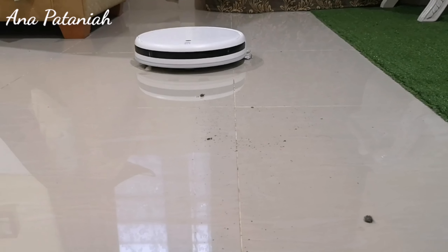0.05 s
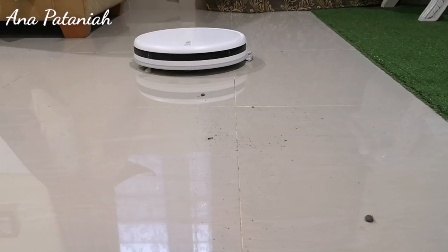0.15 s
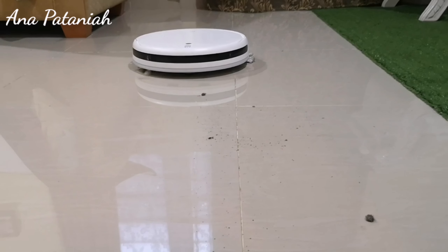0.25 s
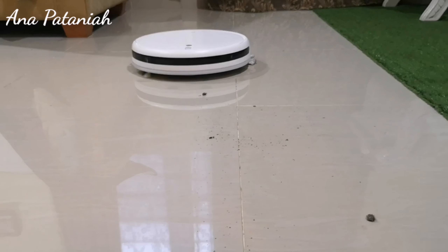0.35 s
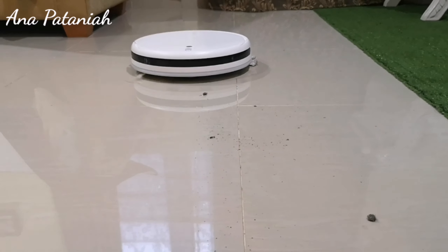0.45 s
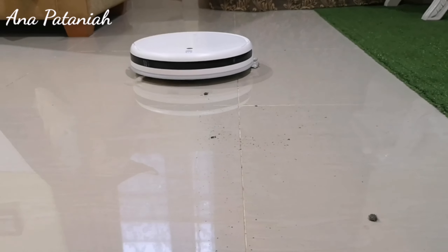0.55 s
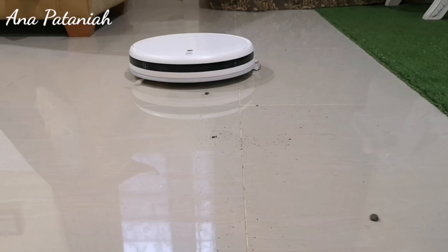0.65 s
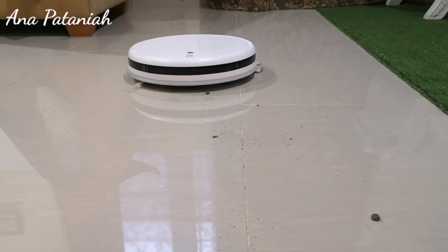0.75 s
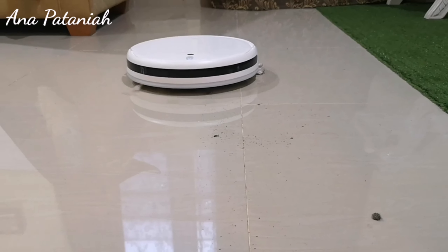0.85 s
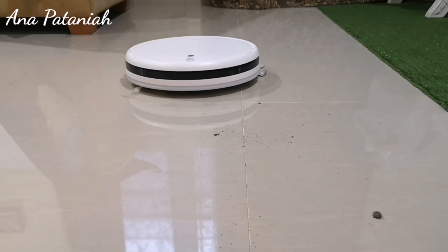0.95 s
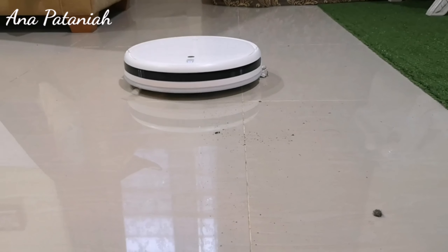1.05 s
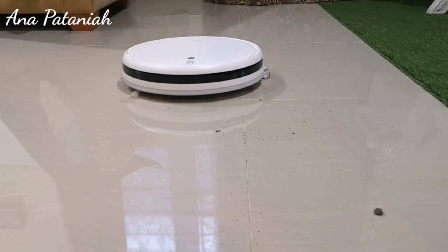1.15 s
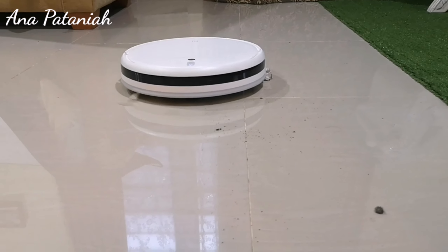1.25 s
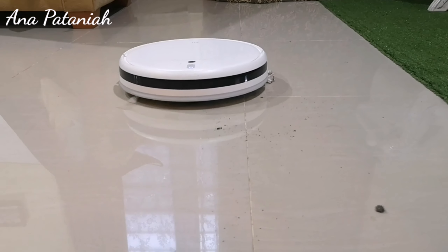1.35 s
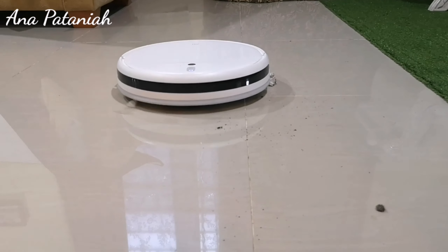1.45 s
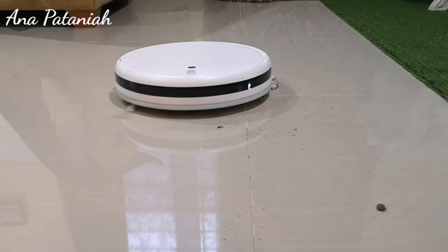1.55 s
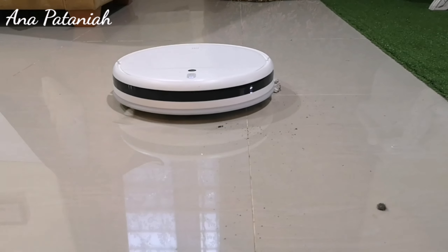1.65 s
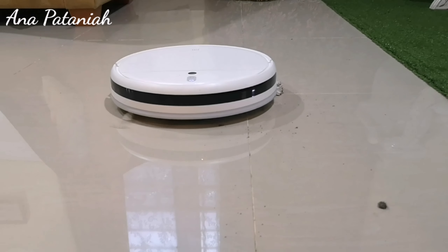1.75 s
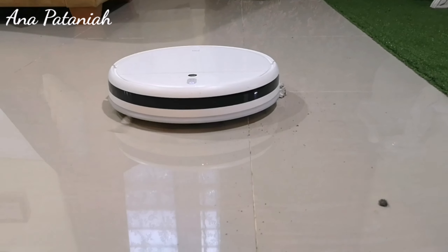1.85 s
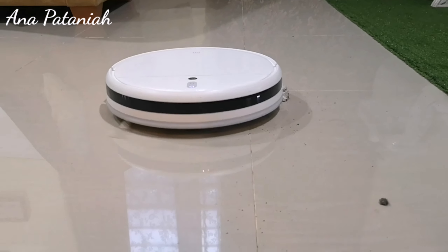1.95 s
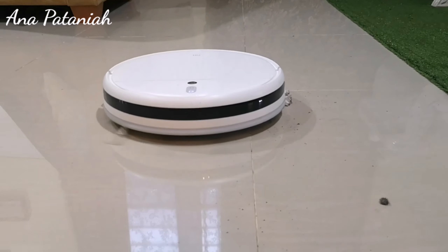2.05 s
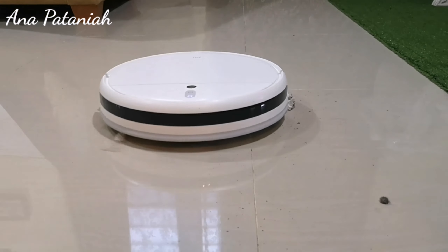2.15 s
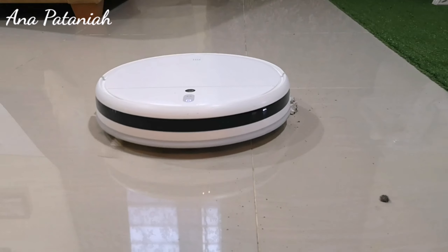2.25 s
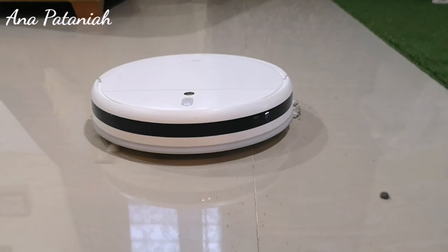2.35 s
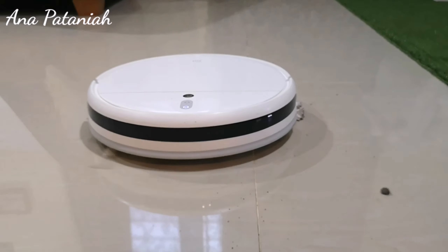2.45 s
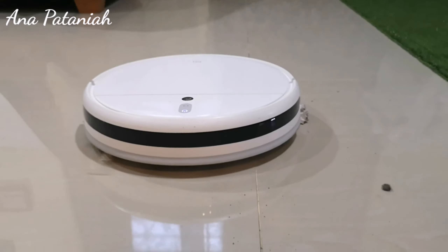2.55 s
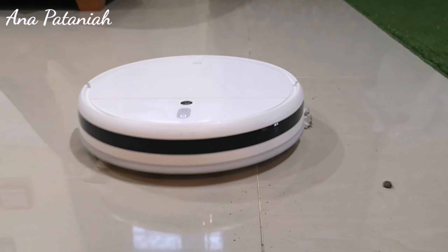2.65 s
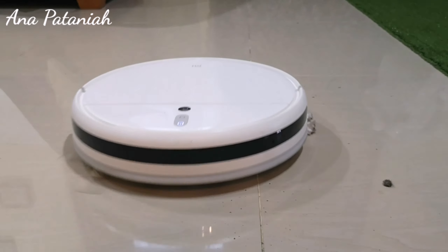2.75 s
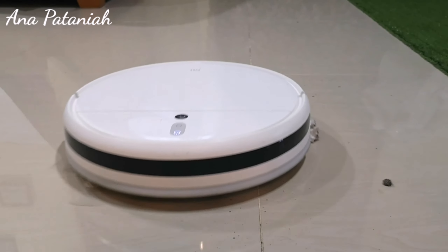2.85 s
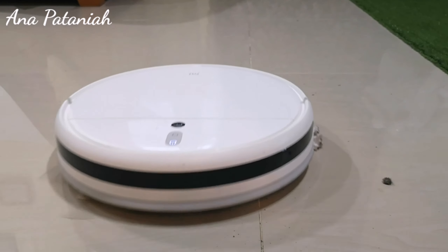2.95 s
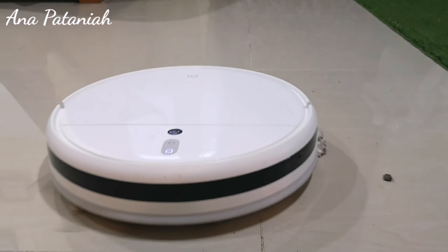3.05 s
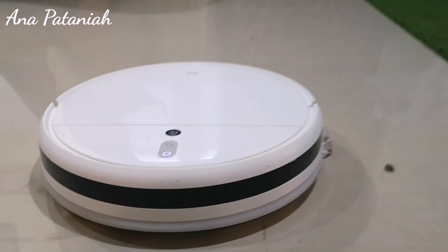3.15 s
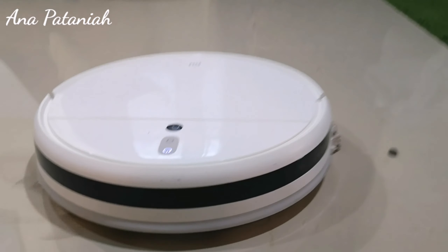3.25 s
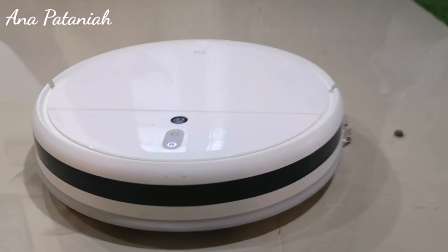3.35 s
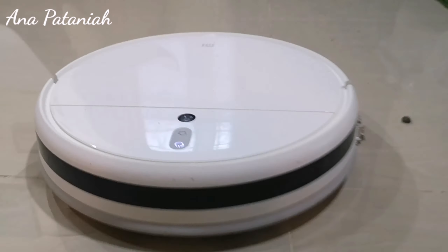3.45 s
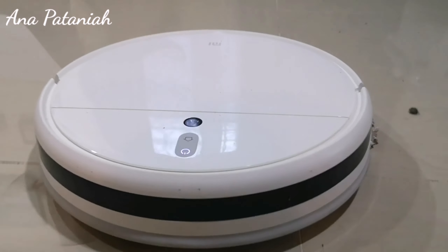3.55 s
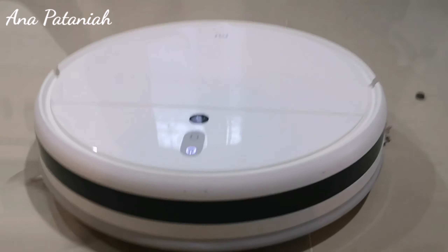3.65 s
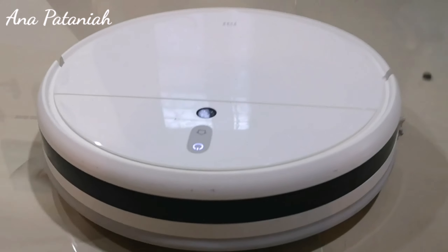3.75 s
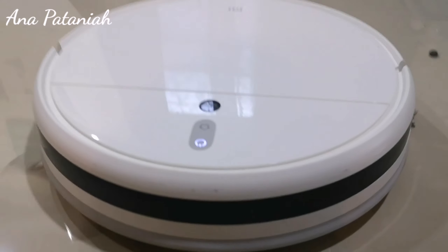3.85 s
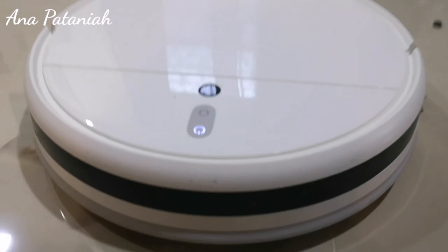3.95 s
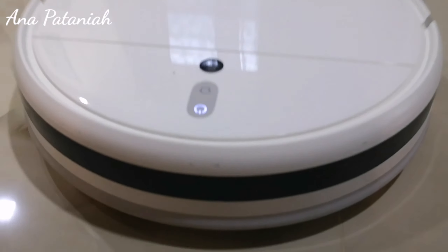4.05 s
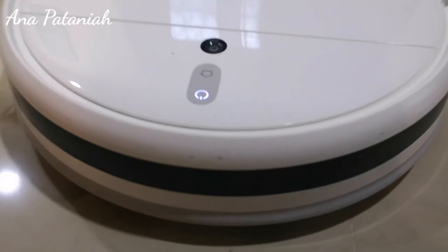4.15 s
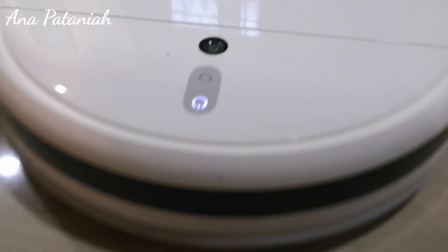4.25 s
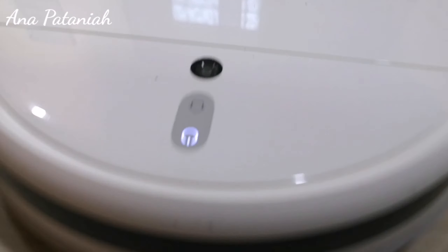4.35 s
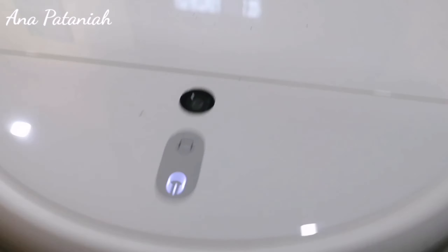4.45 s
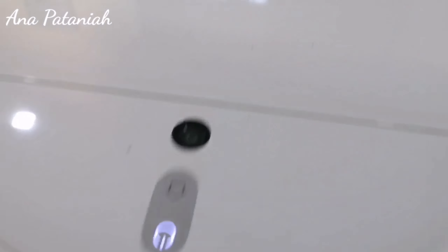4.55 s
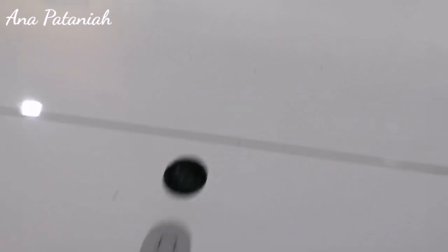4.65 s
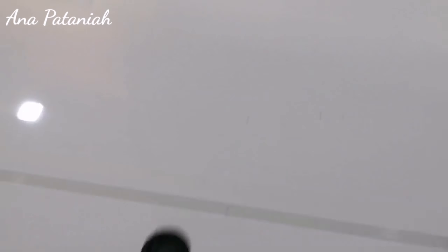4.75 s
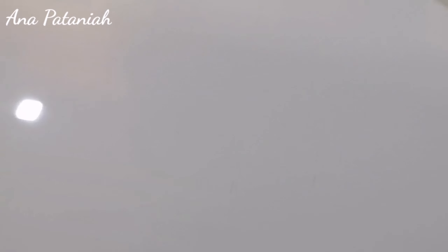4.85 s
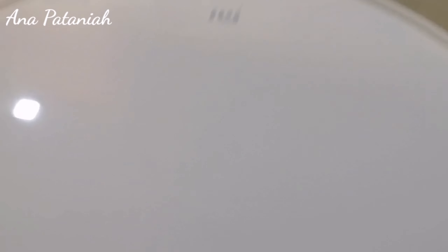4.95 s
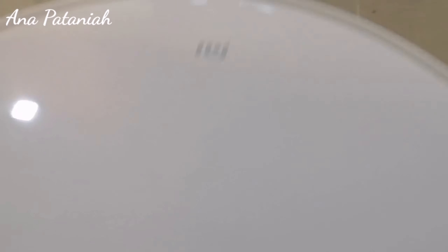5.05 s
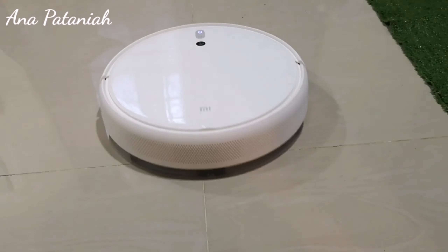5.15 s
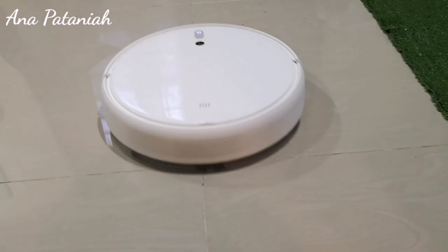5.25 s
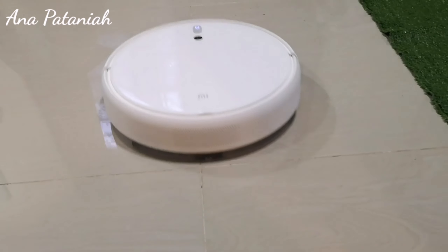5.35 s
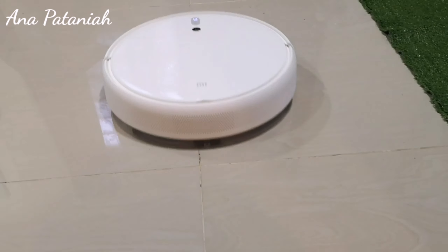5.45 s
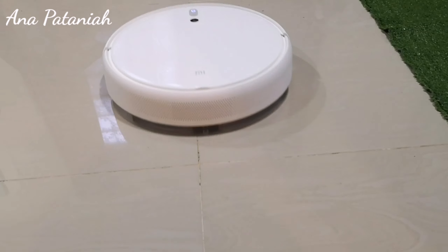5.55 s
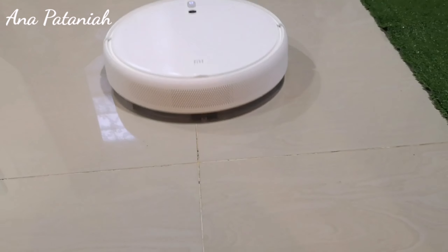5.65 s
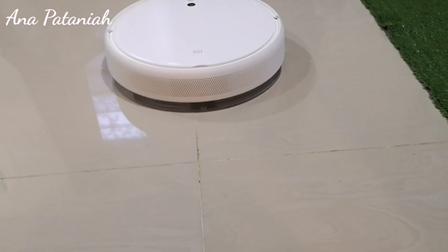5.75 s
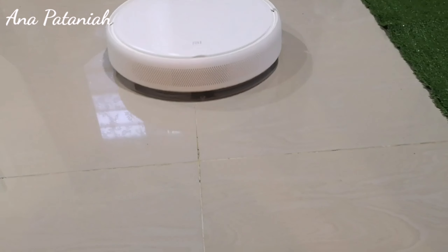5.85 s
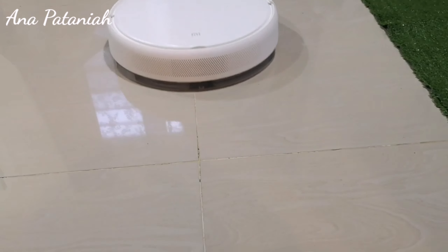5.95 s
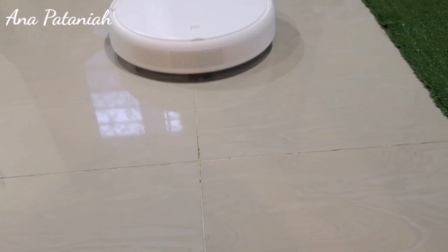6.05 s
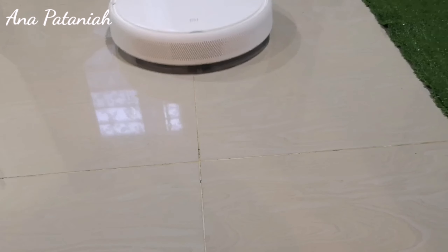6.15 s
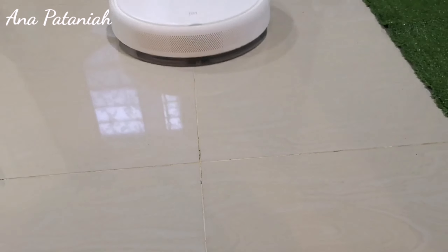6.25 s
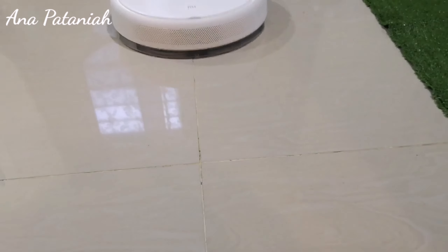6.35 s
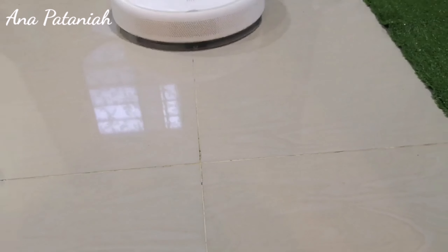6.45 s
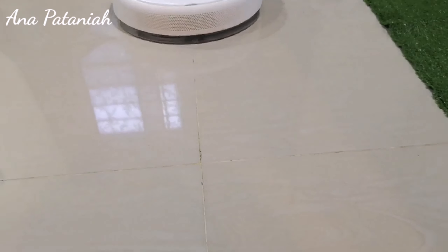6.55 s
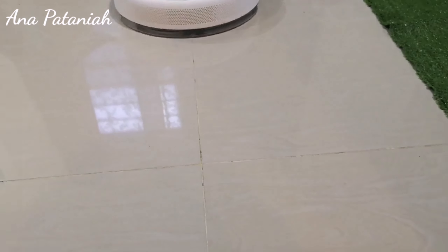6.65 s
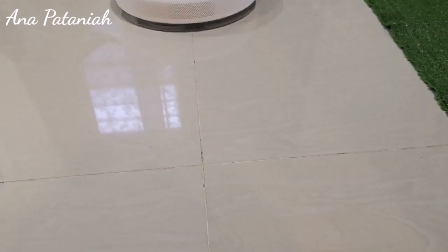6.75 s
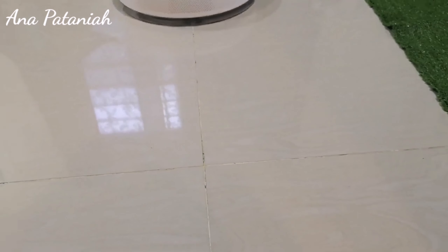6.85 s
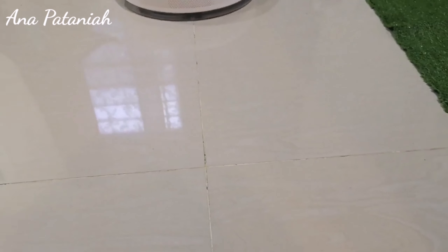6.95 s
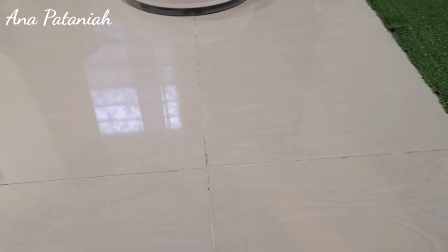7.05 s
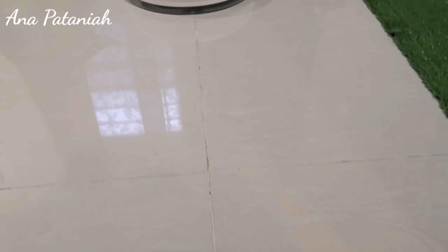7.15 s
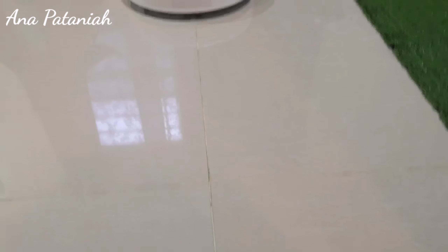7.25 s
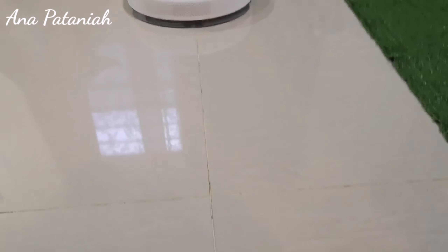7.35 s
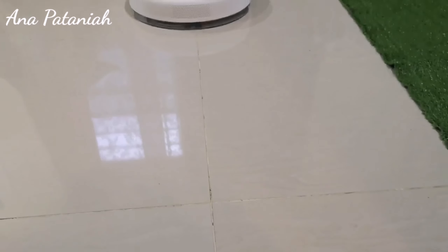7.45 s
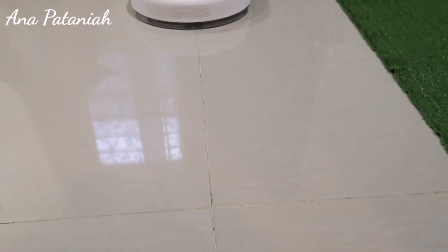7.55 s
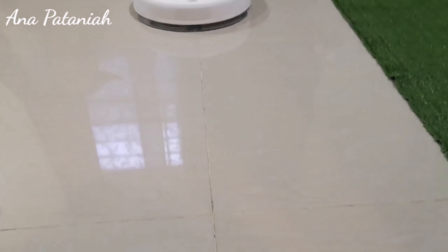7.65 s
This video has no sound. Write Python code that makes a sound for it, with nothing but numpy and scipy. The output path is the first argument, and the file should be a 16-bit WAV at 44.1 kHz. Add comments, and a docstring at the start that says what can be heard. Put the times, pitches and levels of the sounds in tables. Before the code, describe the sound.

Steady suction hum and thin brush whine swell toward the listener over a tiled floor, cut out for a moment, then return with a breathier exhaust.

```python
"""The suction fan of a robot vacuum hums and hisses while the machine rolls over glazed tiles.
It nears from the front, the sound fades out, then it resumes from behind the machine.
Shaped noise makes the air; steady partials make the fan, the brush motor's whine and the uneven wheel gears.
The roller's flaps pulse the treble, short rings make grit clicks, and narrow noise bands whistle and slide.
Rumble and a faint mains hum lie underneath."""
import sys
import numpy as np
from scipy import signal
from scipy.fft import rfft, irfft, next_fast_len
from scipy.io import wavfile
from scipy.ndimage import uniform_filter1d

SR = 44100
rng = np.random.default_rng(int(sys.argv[2]) if len(sys.argv) > 2 else 0)


def store_pcm(level_fs):
    """Save levels as 16-bit WAV."""
    pcm = np.round(np.clip(level_fs, -1, 1) * 32767).astype(np.int16)
    wavfile.write(sys.argv[1], SR, np.atleast_2d(pcm).T)


def magnitude_from_level(level_db):
    """Linear magnitude for a level in decibels (20 dB per decade)."""
    exponent = np.asarray(level_db, float) / 20
    return 10 ** exponent


N = 340011
REAR_FROM_S = 5.45  # from here on the machine is heard from behind


def column(table, t, k):
    """One column of a front and rear pair of curves, read at the times t."""
    rows = np.vstack(table)
    return np.interp(t, rows[:, 0], rows[:, k])


def over_hz(points, hz):
    """A table read on a log-frequency axis, the way we hear pitch."""
    f, v = np.transpose(points)
    return np.interp(np.log(hz + 1), np.log(f), v)


def sides(pan_db):
    """Left and right gains, each taking half of the level difference."""
    return magnitude_from_level(np.array([pan_db, -pan_db]) / 2)


def walk(rate, channels=1):
    """Smooth random wander: levels held for 1 / rate s and slewed twice, with a spread of 1."""
    k = int(SR / rate)
    steps = np.repeat(rng.standard_normal((channels, N // k + 1)), k, axis=1)
    w = uniform_filter1d(uniform_filter1d(steps, k), k)[:, :N]
    return w / w.std()


def tone(hz, db, fading_db, drift=0.69):
    """A steady partial of rms level db; room echoes make it fade apart at the two microphones."""
    start = rng.uniform(0, 2 * np.pi)
    phase = 2 * np.pi * np.cumsum(hz) / SR + start + drift * walk(2.7, channels=2)
    return np.sqrt(2) * magnitude_from_level(db + fading_db * walk(6, channels=2)) * np.sin(phase)


def narrow(hz, reach_hz):
    """Noise reaching about reach_hz either side of a moving centre, partly shared by both sides."""
    lowpass = signal.butter(2, reach_hz, fs=SR, output="sos")
    slow = signal.sosfilt(lowpass, rng.standard_normal((2, 3, len(hz))))
    swing = (slow[0] + 1j * slow[1]) / slow.std()
    swing = 0.66 * swing[0] + 0.51 * swing[1:]
    return np.real(swing * np.exp(2j * np.pi * np.cumsum(hz) / SR))


# path of the machine, front then rear: t/s, nearness/dB, microphones over the lid (0-1),
# bearing as left minus right level/dB
PATH = [
    [(0, -0.5, 0, 0.5), (.6, 1.5, 0.04, 0), (1.25, 4, 0.04, 0), (1.55, 4.5, 0.12, -1.5),
     (1.85, 7, 0.03, -3), (2.15, 6.5, 0.01, -4), (2.75, 7.5, 0, -1), (3.1, 9.5, 0.06, -0.5),
     (3.7, 9, 0.04, -1), (4.0, 10, 0.22, -4), (4.2, 8.5, .3, -2.5), (4.6, 11, 0.58, -2.5),
     (4.75, 10.5, 0.7, -1), (4.95, 10, 0.55, -4), (5.1, 8.5, 0.88, -1), (5.28, 10, 0.9, -1.5)],
    [(5.56, -0.5, 0, -2.5), (5.87, 0.5, 0, 4), (6.5, -1, 0.23, 2.5), (7.1, -1.5, 0.09, 2),
     (7.7, -5, 0.02, 4)],
]


def follow(t, laws):
    """A level in dB from nearness and the place over the lid, by a front and a rear law."""
    base_db, slope, lid_db = np.where(t > REAR_FROM_S, *np.array(laws)[::-1, :, None])
    return base_db + slope * column(PATH, t, 1) + lid_db * column(PATH, t, 2)


# body, shell, duct, outlet, hiss and top of the air noise, front then rear:
# level/dB, dB per dB of nearness, dB more over the lid
AIR_LAWS = [
    [(-66, 0.923, 8.5), (-59, 0.8154, 0.5), (-56, 0.56, 6.5), (-59, 0.6762, 4), (-57, 0.9739, -1.5),
     (-70, .5, 5)],
    [(-54.5, 1.16, 0), (-49.5, 0.87, 3.5), (-45.5, 0.64, 3.5), (-59, 0.3, 1), (-54.5, 1.46, -3),
     (-71.5, 0.2, 4)],
]
# room rumble, front then rear: t/s, level/dB
RUMBLE = [
    [(0, -62), (.9, -57.5), (1.25, -52), (1.85, -52.5), (2.15, -56), (2.9, -54), (3.3, -57), (3.45, -53),
     (3.6, -57), (3.72, -52), (4.05, -56), (4.3, -52), (4.7, -52), (5.28, -56)],
    [(5.56, -60), (6.2, -59), (6.5, -58.5), (7.0, -56), (7.7, -57)],
]


def air_db(t, k):
    """Level of air band k; the lowest band is the room's rumble."""
    if k == 0:
        return column(RUMBLE, t, 1)
    return follow(t, [laws[k - 1] for laws in AIR_LAWS])


# hum from the house: f/Hz, peak level/dB before wavering
HUM = [(49, -62), (99, -60)]


def mains():
    """A faint wavering hum from the house, the same on both sides."""
    phase = 2 * np.pi * np.arange(N) / SR
    return sum(magnitude_from_level(db + 2.6 * walk(5)) * np.sin(hz * phase + 1.3 * walk(4)) for hz, db in HUM)


# bands that slide upward as the machine nears and passes under the microphones:
# start t/s, length t/s, from f/Hz, to f/Hz, level/dB at the middle
SLIDES = [(0.901, 0.79, 220, 235, -60.5), (1.2, 1.4, 945, 990, -58.5), (3.6, 0.39, 185, 230.1, -53),
          (3.749, 0.47, 3103, 3240, -54), (3.85, 0.52, 2420, 2496, -51), (4.15, .6, 175, 190, -50),
          (4.149, .5, 3000, 3250, -52), (4.45, 0.46, 2300, 2455, -46.5), (4.5, .8, 1500, 1650, -55.5),
          (4.55, 0.54, 1960, 2050, -53.5), (4.65, 0.8, 290, 320.3, -52.5), (4.798, .6, 2800, 3190, -47.5),
          (4.95, 0.5, 3450, 3550, -51), (4.95, 0.52, 2347, 2550, -47)]


def slides():
    """Narrow bands of noise that each swell, climb and fade."""
    out = np.zeros((2, N))
    for s, length, from_hz, to_hz, db in SLIDES:
        i = int(s * SR)
        along = np.arange(int(length * SR)) / (length * SR)
        band = narrow(from_hz + (to_hz - from_hz) * along, 15 + from_hz / 60)
        out[:, i:i + len(along)] += magnitude_from_level(db) * np.sin(np.pi * along) * band
    return out


# patches of fine dirt: start t/s, length t/s, grains per s, level/dB, ring f/Hz
DIRT = [(1.596, 0.41, 190, -56, 1600), (3.9, 0.19, 200, -54, 1898), (4.5, 0.22, 290, -53, 2098),
        (4.998, .4, 400, -49.5, 2696)]


def dirt(t):
    """Fine grains patter into the shell, each a random tap through a band filter."""
    out = 0
    dice, size = rng.random((2, N))
    size_db = -1.8 * np.log(1 - size)
    for s, length, rate, db, hz in DIRT:
        patch = np.sin(np.pi * np.clip((t - s) / length, 0, 1))
        grains = (dice < rate / SR) * magnitude_from_level(size_db) * patch
        shell = signal.butter(2, [0.66 * hz, 1.27 * hz], "band", fs=SR, output="sos")
        ring = signal.sosfilt(shell, grains)
        out = out + magnitude_from_level(db) * ring / np.sqrt(np.sum(ring ** 2) / (length * SR) + 1e-18)
    return out * sides(-1.5)[:, None]


# grit touching the shell, each bounce a row: t/s, peak level/dB before panning, ring f/Hz,
# left minus right level/dB, time to ring down 60 dB t/s
GRIT = [(1.4505, -31, 1820, -9, .016), (1.4535, -35, 1820, -9, .012), (1.483, -40, 1780, -6, .016),
        (1.517, -38.5, 1100, -3, .01), (1.519, -38, 2050, -3, .01), (1.555, -39, 2050, -5, .01),
        (1.698, -36, 1800, -10, .012), (1.707, -40, 1500, -6, .01), (1.784, -37, 1800, -6, .016),
        (1.797, -39, 980, -3, .025), (1.816, -37, 1750, -6, .012), (1.853, -37, 1560, -6, .018),
        (1.8695, -35, 1530, -7, .016), (1.870, -34.5, 980, -4, .02), (1.920, -36, 1800, -3, .012),
        (1.936, -38, 960, -3, .025), (3.52203, -22.5, 1960, -4, .018), (3.5246, -18.5, 1960, -4, .015),
        (3.52765, -22, 1960, -4, .008), (3.5385, -30.5, 1950, -4, .014), (3.541, -31.5, 2050, -4, .01),
        (3.5485, -32.5, 1550, -4, .01), (3.554, -33.5, 1650, -4, .012), (3.5575, -31, 1650, -4, .01),
        (3.9634, -25, 1280, -2.5, .005), (3.9657, -33.5, 1500, -2.5, .006), (4.007, -35.5, 1500, -4, .01),
        (4.544, -33, 1600, -2.5, .01), (4.672, -31, 2300, 0, .01)]
# ways the shell rings: times the ring f, level/dB, times the ring-down time
GRIT_MODES = [(.36, -20, 2.2), (.58, -9, 1.2), (1, 0, 1), (1.185, -4, 1), (2.2, -16, .6)]


def grit():
    """Each touch rings the plastic shell briefly; the push takes a cycle to build."""
    out = np.zeros((2, N))
    age = np.arange(SR // 10) / SR
    for s, db, hz, pan_db, t60 in GRIT:
        ring = 0
        for times_hz, mode_db, longer in GRIT_MODES:
            decay = 1000 ** (-age / (longer * t60))
            ring = ring + magnitude_from_level(mode_db) * np.sin(2 * np.pi * times_hz * hz * age) * decay
        ring = ring * np.minimum(age * hz, 1)
        i = int((s - .0003) * SR)  # the push starts 0.3 ms before the listed time
        out[:, i:i + len(age)] += magnitude_from_level(db) * ring / np.abs(ring).max() * sides(pan_db)[:, None]
    return out


# wheel gear mesh, pitch following the drive speed, front then rear:
# t/s, f/Hz, level/dB, left minus right level/dB
WHEELS = [
    [(0, 1434, -51, -1.5), (.3, 1437, -53.5, 2), (.4, 1424, -53, -2), (.6, 1433, -47.5, -3.5),
     (.72, 1414, -55, -3), (.85, 1414, -55.5, -3), (.93, 1415, -50.5, -2), (1.05, 1417, -50.5, -2),
     (1.27, 1414, -56.5, 0), (1.42, 1425, -53, 0), (1.55, 1428, -59, 0), (1.63, 1430, -50, 0),
     (1.84, 1413, -53, -4), (1.95, 1434, -55, 1), (2.25, 1435, -55, 2), (2.48, 1443, -50, -5),
     (2.8, 1442, -50, 1), (3.1, 1436, -48.5, -1), (3.62, 1436, -47.5, -4), (3.95, 1439, -50, 1),
     (4.05, 1432, -57, 3), (4.22, 1434, -53, 8), (4.33, 1440, -59, 0), (4.51, 1454, -53, -8),
     (4.63, 1429, -52, -5), (4.95, 1431, -48.5, -16), (5.1, 1430, -52.5, -11), (5.16, 1430, -57, -5),
     (5.28, 1433, -51, 6)],
    [(5.56, 1384, -55.5, .5), (6.0, 1394, -56, 2), (6.12, 1407, -52.5, -2), (6.55, 1434, -57, -3),
     (6.62, 1426, -53, -6), (6.8, 1431, -56, 3), (6.9, 1423, -59, -5), (7.37, 1439, -55, 1.5),
     (7.52, 1445, -51, -3), (7.71, 1428, -57, 2)],
]


def wheels(t):
    """Two drive gears sing near one pitch and waver apart, as they never turn quite alike."""
    hz, db = column(WHEELS, t, 1), column(WHEELS, t, 2)
    jitter_hz = np.gradient(walk(45)[0]) * SR / 9  # shakes the phase by about a ninth of a turn
    first = tone(hz + jitter_hz, db, 1.2, drift=0.39)
    split_hz = 9.0 * walk(3)[0] + 7.88 * walk(35)[0]
    second = tone(hz + split_hz, db - 9, 2.5, drift=0.64)
    return (first + second) * sides(column(WHEELS, t, 3))


# a hollow under the lid that lifts the brush motor's sixth and the fan's fourth order
# as the machine nears, front then rear: t/s, level/dB
HOLLOW = [
    [(0, -78), (1.2, -73), (2.1, -77), (2.6, -70), (3.2, -63.5), (3.6, -64), (3.9, -64), (4.15, -58.5),
     (4.4, -62), (4.7, -57), (5.0, -60), (5.15, -57), (5.28, -60)],
    [(5.56, -70), (7.71, -73)],
]


def hollow_db(t):
    """Level of the resonance in the hollow under the lid."""
    return column(HOLLOW, t, 1)


MESH_TEETH = 22
FLAPS_PER_TURN = .4865  # flap cycles per motor turn
# brush gear mesh, swelling and sinking over the room's loud and quiet spots, front then rear:
# t/s, f/Hz, level/dB, left minus right level/dB
BRUSH = [
    [(0, 2797, -58.5, -8), (.55, 2801, -55, -20), (.8, 2803, -53.5, 8), (1.0, 2800, -56.5, -12),
     (1.1, 2806, -58, -2), (1.3, 2803, -57, -5), (1.9, 2808, -52.5, 8), (2.2, 2803, -47.5, -8),
     (2.4, 2807, -51.5, -1), (2.9, 2800, -45.5, 10.5), (3.06, 2805, -43, 2), (3.34, 2801, -40.5, -1),
     (3.45, 2805, -46.5, -4.5), (3.69, 2808, -48, -11), (3.75, 2803, -67, 2), (3.9, 2797, -51, 1),
     (4.16, 2795, -43, -23), (4.48, 2798, -43.5, -18.5), (4.57, 2790, -55, -16), (4.7, 2792, -45, -7),
     (4.98, 2799, -41, -7.5), (5.12, 2797, -46.5, -9.5), (5.28, 2788, -46.5, 4)],
    [(5.56, 2716, -56, -13), (6.04, 2720, -53, -5), (6.4, 2720, -58, -16), (7.3, 2720, -54.5, 6),
     (7.71, 2720, -68, -3)],
]
# brush motor housing, front then rear: level/dB, dB per dB of nearness, dB more over the lid
HOUSING_LAWS = [(-74, 1.38, 6.5), (-63, .3, 0)]
# brush motor orders: multiples of the shaft speed
BRUSH_ORDERS = [9, 19, 25, 42]
# each order over the housing, seen from the front: level/dB
BRUSH_FRONT_DB = [-.5, -7.5, -8, -11.5]
# the same from the rear: level/dB
BRUSH_REAR_DB = [-5, -3, -13, -24]
# what each order gains over the lid: level/dB
BRUSH_LID_DB = [0, -3, -1, 1]


def brush(t, rear, turns):
    """Gear mesh with sidebands from an off-centre wheel, motor orders, and the roller's thrum."""
    shaft_hz = np.gradient(turns) * SR
    mesh_hz, mesh_db = MESH_TEETH * shaft_hz, column(BRUSH, t, 2)
    mesh_sides = sides(column(BRUSH, t, 3))
    housing_db = follow(t, HOUSING_LAWS) + .6 * walk(3)[0]
    # the off-centre wheel makes the mesh louder and softer as it turns
    eccentric = np.sin(2 * np.pi * turns * FLAPS_PER_TURN * 2 / 3 + 1.2 * walk(9)[0])
    wobble = 1 + 0.098 * walk(60)[0] + (0.28 + 0.12 * walk(5.4)[0]) * eccentric
    mesh = tone(mesh_hz + 2.2 * walk(40)[0], mesh_db, 0.7, drift=0.3)
    out = mesh * wobble * mesh_sides * magnitude_from_level(1.2 * walk(14))
    # tooth chatter around the mesh line
    out = out + magnitude_from_level(mesh_db - 11.5) * narrow(mesh_hz, 85.) * mesh_sides
    for order, front_db, rear_db, lid_db in zip(BRUSH_ORDERS, BRUSH_FRONT_DB, BRUSH_REAR_DB, BRUSH_LID_DB):
        db = housing_db + np.where(rear, rear_db, front_db) + lid_db * column(PATH, t, 2)
        out = out + tone(order * shaft_hz, db, 1.3, drift=.35)
    # sideband one order below the mesh
    out = out + tone((MESH_TEETH - 1) * shaft_hz, mesh_db - 13.5, 3.0) * wobble
    out = out + tone(6 * shaft_hz, hollow_db(t), .8, drift=.3)
    # air breathing in the same hollow
    out = out + magnitude_from_level(hollow_db(t) - 2) * narrow(730 + 0 * t, 110.)
    out = out + tone(3 * shaft_hz, air_db(t, 2) - 12.0, 2.8)
    thrum_db = air_db(t, 1) + np.where(rear, -9, 3) - 5 * column(PATH, t, 2) + 1.5 * walk(3)[0]
    return out + magnitude_from_level(thrum_db) * np.sin(4 * np.pi * turns * FLAPS_PER_TURN)


def motor_turns(t):
    """Turns of the brush motor so far, from its smoothed gear pitch."""
    return np.cumsum(uniform_filter1d(column(BRUSH, t, 1), SR // 4) / MESH_TEETH) / SR


def roller_flaps(turns):
    """Two unequal blades: a sharp scrape, then a weaker one half a cycle on."""
    cycle = turns * FLAPS_PER_TURN % 1
    return np.exp(-cycle / 0.2) + 0.15 * np.exp(-((cycle + .5) % 1) / 0.087)


# outlet whistle, front then rear: t/s, f/Hz, level/dB
WHISTLE = [
    [(0, 5350, -77), (2, 5350, -67), (3.5, 5530, -60), (4.2, 5760, -54.5), (4.7, 5900, -49.5),
     (5.28, 6050, -59)],
    [(5.56, 2386, -51.5), (5.85, 2429, -42), (6.2, 2442, -47), (6.6, 2422, -47.5), (7.1, 2400, -58),
     (7.7, 2370, -71)],
]


def whistle(t):
    """Air rushing past the outlet grille sings in a narrow band of sliding pitch."""
    return magnitude_from_level(column(WHISTLE, t, 2) + 1.0 * walk(14)) * narrow(column(WHISTLE, t, 1), 130.)


# shaft speed, front then rear: f/Hz
FAN_HZ = [198.5, 198.25]
# fan eighth order, front then rear: t/s, level/dB, left minus right level/dB
FAN = [
    [(0, -75, -5), (1.2, -77, -3), (1.45, -59, -3), (2.16, -59.5, -17), (2.62, -54, -4), (2.76, -70, -2),
     (2.91, -55, 0), (3.75, -54, -15), (4.0, -62, -3), (4.38, -58, 2), (4.44, -52, -5), (4.51, -55, -8),
     (4.6, -47, -10), (4.7, -53, -6), (5.06, -52, -2), (5.15, -63, 2), (5.28, -54, 8.5)],
    [(5.56, -51, 3), (6.11, -50, -4), (6.4, -50, -2), (6.92, -48.5, 0), (7.2, -51, 3), (7.4, -49.5, 2),
     (7.71, -51, 0)],
]
# shaft hum, loud and quiet spots along the path, front then rear: t/s, peak level/dB before wavering
SHAFT = [
    [(0, -71), (.8, -62), (1.15, -51.5), (1.5, -60), (1.75, -52), (2.3, -53.5), (2.45, -49), (2.7, -53.5),
     (2.94, -46.5), (3.3, -52), (3.44, -47), (3.52, -55), (3.63, -58), (3.675, -41), (3.74, -47),
     (3.82, -46), (3.95, -53.5), (4.09, -58.5), (4.27, -43), (4.6, -47.5), (4.9, -49.5), (5.15, -49.5),
     (5.28, -58)],
    [(5.56, -51), (5.9, -48.5), (6.1, -52), (6.3, -49.5), (6.7, -52.5), (7.02, -60), (7.31, -50),
     (7.71, -59)],
]
# high and low fan orders: multiples of the shaft speed
FAN_ORDERS = [5, 10, 19, 36, 37, 39, 40, 43, 47, 61, 63, 64, 66, 67, 68, 70, 71, 72, 73, 76]
# each order over the hiss, seen from the front: level/dB
FAN_FRONT_DB = [-15, -21.5, -24.5, -27, -42, -28, -29, -17, -34, -45, -42.5, -46, -47, -46.5, -47, -41.5,
                -48, -39, -42, -44]
# the same from the rear: level/dB
FAN_REAR_DB = [-6, -7, -12, -9, -31, -20, -23, -16, -9.5, -34, -31, -34, -35, -40, -34, -35, -35, -21, -40,
               -30.5]


def fan(t, rear):
    """A very steady shaft: hum, a strong eighth order, thin orders that leave mainly by the exhaust."""
    shaft_hz = np.where(rear, *FAN_HZ[::-1])
    out = tone(8 * shaft_hz, column(FAN, t, 1), 1, drift=.35) * sides(column(FAN, t, 2))
    out = out + tone(4 * shaft_hz, hollow_db(t) - 4, 2.5)
    hum_db = column(SHAFT, t, 1) + np.where(rear, 1.5, 2.4) * walk(16)
    hum_phase = 2 * np.pi * np.cumsum(shaft_hz) / SR + np.where(rear, .2, .7) * walk(20)
    out = out + magnitude_from_level(hum_db) * np.sin(hum_phase)
    for order, front_db, rear_db in zip(FAN_ORDERS, FAN_FRONT_DB, FAN_REAR_DB):
        out = out + tone(order * shaft_hz, air_db(t, 5) + np.where(rear, rear_db, front_db), 2.8)
    return out


# bands of the air noise whose levels are set one by one: from f/Hz, to f/Hz
AIR_BANDS = [(25, 80), (215, 370), (450, 1300), (1650, 2600), (2900, 3800), (4000, 10000), (10500, 15000)]
# colour of the noise, front then rear: f/Hz, relative level/dB per Hz
COLOUR = [
    [(12, -36), (20, -4), (115, -0.5), (156, -3.5), (195, -3.5), (264, -9.5), (625, -22.5), (800, -19.5),
     (1320, -14.5), (1440, -10.5), (2570, -7.5), (2800, -9), (3400, -16.5), (9220, -19.5), (15200, -52.5)],
    [(12, -35), (20, 4), (70, -5), (200, -2.5), (287, -7), (369, -7.5), (625, -30.5), (896, -3),
     (1180, -15), (1610, -6.5), (1840, -6.5), (2430, -4), (3400, -17.5), (8490, -35), (15200, -66.5)],
]
# duct resonances, front then rear: f/Hz, width f/Hz, level/dB
DUCT = [
    [(190, 45, 4), (357, 130, 4), (470, 120, -1), (690, 200, -3), (830, 70, -3), (990, 166, 6),
     (2400, 660, -2), (3060, 540, 2), (5350, 300, 2.5), (5760, 230, -1.5), (6295, 410, -4),
     (7770, 220, 4.5), (9420, 300, 3), (14600, 3200, 9.5)],
    [(870, 140, -1.5), (1600, 120, 2.5), (1870, 120, -2.5), (2240, 120, -3.5), (2400, 140, 5),
     (3880, 230, 5.5), (4990, 310, 5.5), (5900, 760, 7.5), (6300, 400, -4.5), (7700, 270, 5),
     (8540, 300, 6)],
]
# likeness of the two microphones, front then rear: f/Hz, likeness (0-1)
ALIKE = [
    [(60, .999), (130, 1), (290, 0.84), (640, 0.28), (1410, 0.63), (3100, 0.38), (6820, 0.11)],
    [(60, 1), (130, 0.97), (290, 1), (640, 0.6), (1410, 0.75), (3100, 0.19), (6820, 0.15)],
]
# their balance, front then rear: f/Hz, left minus right level/dB
BALANCE_DB = [
    [(150, -0.5), (380, 2), (700, 9.5), (1290, -1), (2380, -2), (4400, -3), (8120, 0), (15000, -29)],
    [(150, -0.5), (380, 1.5), (700, 10), (1290, -2), (2380, -3.5), (4400, -5), (8120, 5), (15000, -15.5)],
]
# their timing, front then rear: f/Hz, left leads by (radians)
LEAD = [
    [(30, .04), (60, 0.12), (125, 0.26), (340, 0.62), (1460, 0.27), (2840, 2.16), (5000, 1.4)],
    [(30, .04), (60, 0.13), (125, 0.11), (430, 0.68), (950, 0.23), (2930, .1), (5000, 3.2)],
]
# how deeply the flaps pulse the treble, front then rear: depth (share)
FLAP_DEPTH = [0.61, .15]


def air(t, end, flap):
    """Fan air and bristle noise through the ducts, heard from one end (0 front, 1 rear)."""
    size = next_fast_len(N)
    hz = np.arange(size // 2 + 1) * SR / size
    db = over_hz(COLOUR[end], hz)
    db = db + sum(d / (1 + (2 * (hz - f) / w) ** 2) for f, w, d in DUCT[end])
    # mix shared and separate noise so the two sides are as alike as the table says
    common, left, right = rfft(rng.standard_normal((3, size)))
    alike = np.clip(over_hz(ALIKE[end], hz), 0, 1)
    lead = np.exp(.5j * np.array([[1], [-1]]) * over_hz(LEAD[end], hz))
    ports = np.sqrt(alike) * common * lead + np.sqrt(1 - alike) * np.array([left, right])
    ports = ports * magnitude_from_level(db) * sides(over_hz(BALANCE_DB[end], hz))
    centres = np.log([np.sqrt(lo * hi) for lo, hi in AIR_BANDS])
    pan_db = column([PATH[end]], t, 3)
    out = 0
    for k, (lo, hi) in enumerate(AIR_BANDS):
        inside = np.abs(ports.mean(0)[(hz > lo) & (hz < hi)])
        share = np.interp(np.log(hz + 1), centres, np.eye(len(centres))[k])  # crossfade to neighbours
        band = irfft(ports * share, size)[:, :N] * size / np.sqrt(2 * np.sum(inside ** 2))
        band = band * magnitude_from_level(air_db(t, k) + (0.79, 1.3)[end] * walk(12))
        if k >= 4:  # the bristles scrape with the flaps, and the treble follows the bearing
            scrape = 1 + FLAP_DEPTH[end] * (flap - flap.mean())
            band = band * magnitude_from_level(0.54 * walk(15)) * scrape * sides(pan_db - pan_db.mean())
        out = out + band
    return out


# echo off the floor: t/s, lag t/ms, share (0-1) of the dulled copy
TILES = [(0, 2.14, 0.15), (3.4, 2.16, 0.2), (3.7, 3.1, 0.2), (4.5, 2.7, 0.12), (5.3, 1.926, 0.06),
         (5.5, 2.2, 0.07), (7.7, 4.02, 0.01)]


def via_tiles(x, t):
    """The hard floor sends a later, duller copy: hollow bands that slide as the lag changes."""
    s, lag_ms, share = np.transpose(TILES)
    place = np.arange(N) - np.interp(t, s, lag_ms) * SR / 1000
    dull = signal.sosfilt(signal.butter(2, [700, 4200], "band", fs=SR, output="sos"), x)
    late = np.array([np.interp(place, np.arange(N), side) for side in dull])
    return x + np.interp(t, s, share) * late


def scene():
    """Front and rear views of the same machine, with all its sources added up."""
    t = np.arange(N) / SR
    rear = t > REAR_FROM_S
    turns = motor_turns(t)
    flap = roller_flaps(turns)
    background = mains() + slides() + dirt(t) + grit()
    machine = wheels(t) + brush(t, rear, turns) + whistle(t) + fan(t, rear)
    noise = np.where(rear, air(t, 1, flap), air(t, 0, flap))
    return background + machine + via_tiles(noise, t)


def roll_off(x):
    """The treble ends steeply here."""
    return signal.sosfilt(signal.butter(12, 15640, fs=SR, output="sos"), x)


# fade before the silence: t/s, gain level/dB
FADE = [(5.286, 1.5), (5.305, -5.5), (5.34, -21), (5.365, -20.5)]


def record(dry):
    """A quick fade to silence, an abrupt return, a steep top cut; a small offset rides with the sound and fades
    with it."""
    t = np.arange(N) / SR
    s, db = np.transpose(FADE)
    fading = magnitude_from_level(np.interp(t, s, db)) * (t < s[-1])
    gain = np.where(t > 5.548, 1, fading)  # the sound resumes at 5.548 s
    top_cut = signal.ellip(12, .2, 80, 15080, fs=SR, output="sos")  # lowpass at 15080 Hz
    finished = signal.sosfilt(top_cut, (dry - .0005) * gain)
    return roll_off(finished)


dry = scene()
out = record(dry)
store_pcm(out)
```